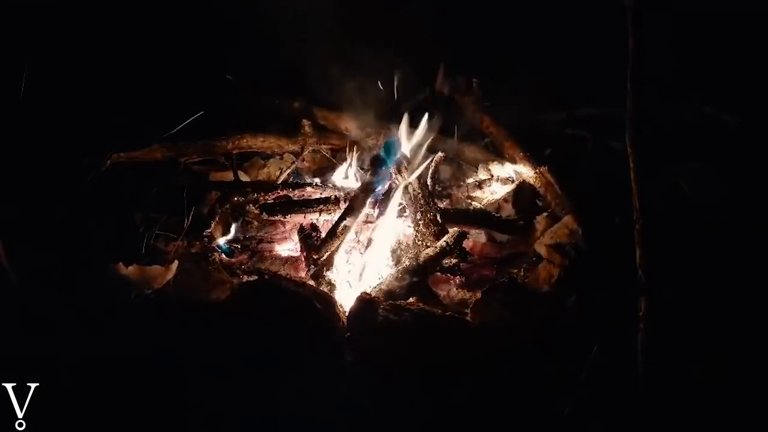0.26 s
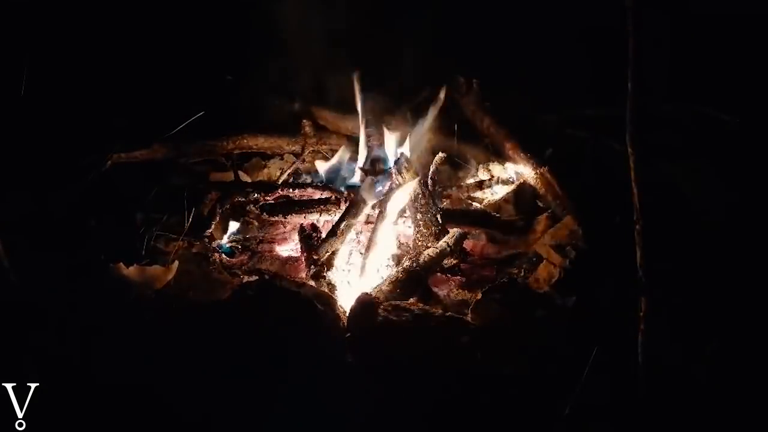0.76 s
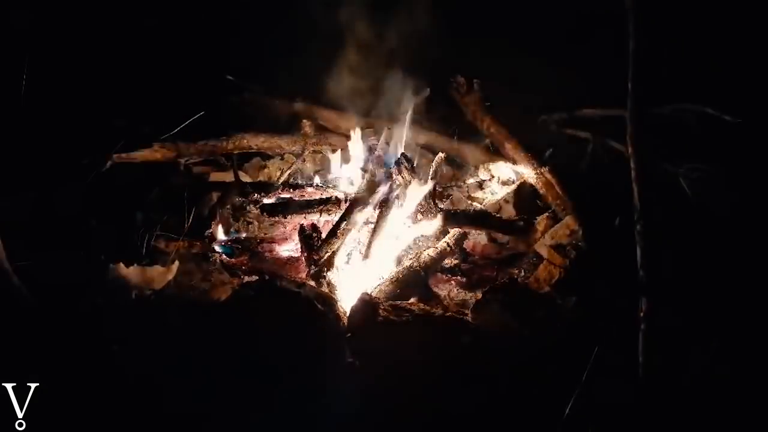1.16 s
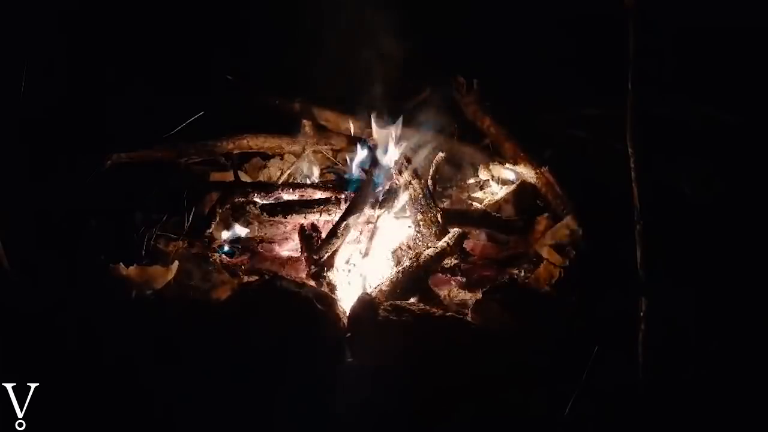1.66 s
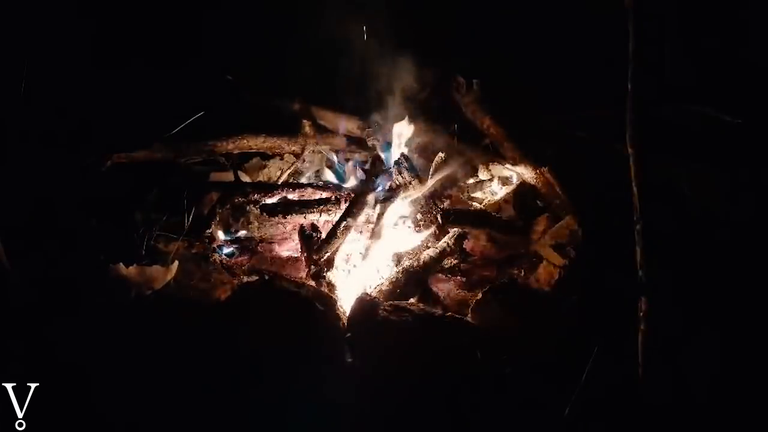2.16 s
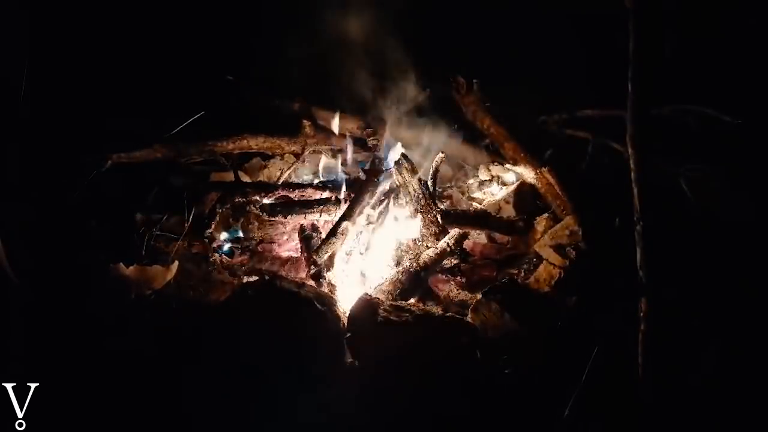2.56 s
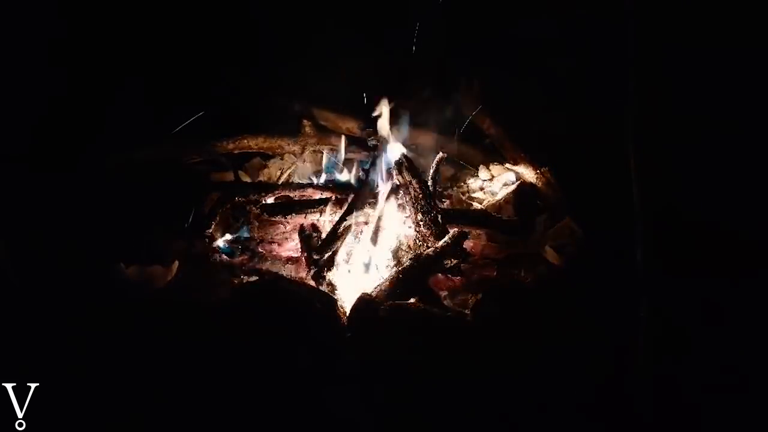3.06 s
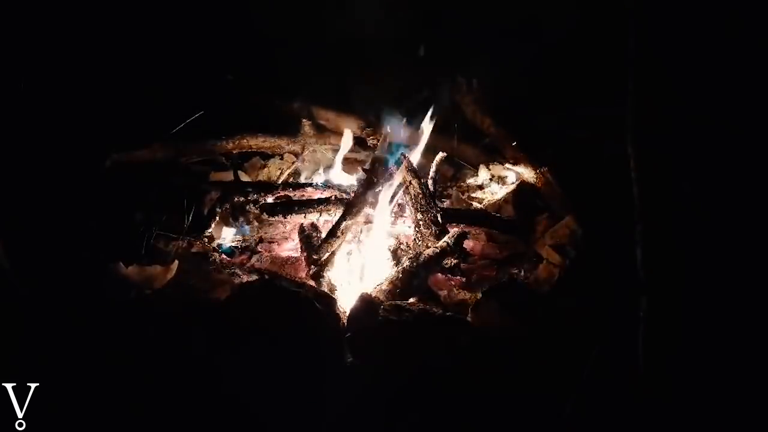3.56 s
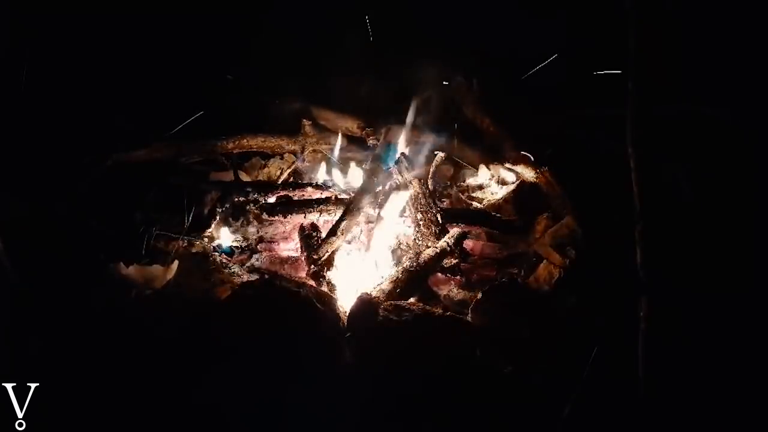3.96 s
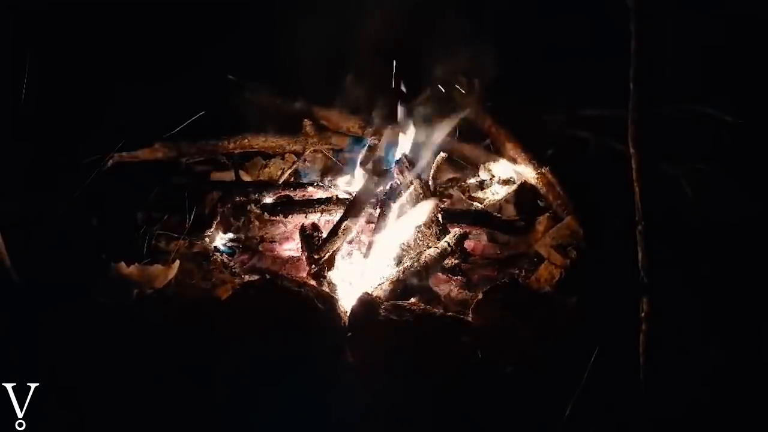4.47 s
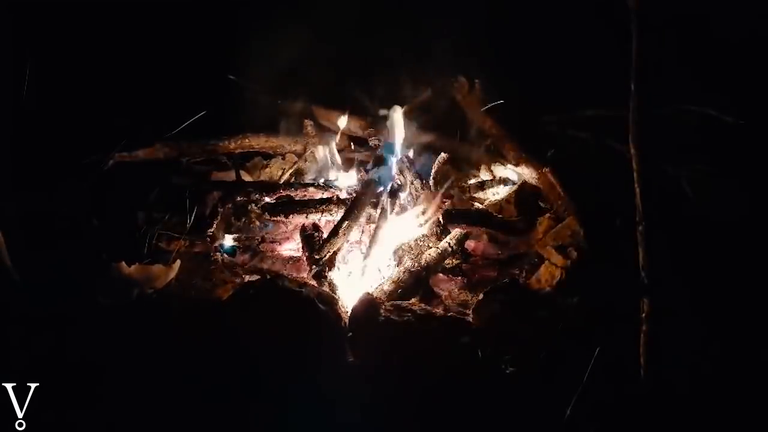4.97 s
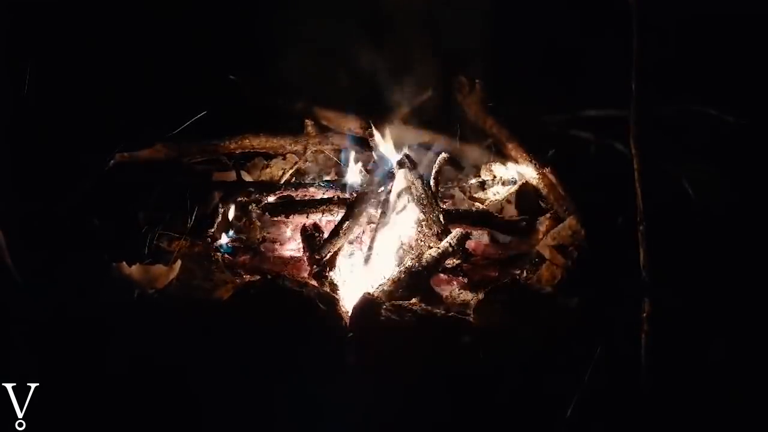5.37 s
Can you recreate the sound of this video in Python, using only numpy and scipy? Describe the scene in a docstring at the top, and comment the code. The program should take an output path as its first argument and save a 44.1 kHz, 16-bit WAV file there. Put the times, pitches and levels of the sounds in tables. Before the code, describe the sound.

A wood fire crackles outdoors at night, dry ticks and sharp loud pops over a low fluttering rumble and faint hiss.

```python
"""A campfire a little to the left of a stereo microphone.
Flames rumble and hiss throughout as shaped noise, and embers tick from the first moments as damped rings.
A log then bumps softly and others split with sharp pops: short shocks exciting resonances of the wood.
From about one second on, steam also spits from the bark in bright bursts.
Ground, woodpile and trees return the sound as a delayed copy, early reflections and a scattered tail."""
import sys
import numpy as np
from scipy import signal
from scipy.fft import rfft, irfft
from scipy.io import wavfile
from scipy.ndimage import uniform_filter1d

SR = 44100
rng = np.random.default_rng(int(sys.argv[2]) if len(sys.argv) > 2 else 0)


def int16_out(signal):
    """Quantize to a 16-bit WAV file."""
    q = np.round(np.clip(np.atleast_2d(signal).T, -1, 1) * 32767)
    wavfile.write(sys.argv[1], SR, q.astype(np.int16))


N = 247886

# the flames swell and sink: t/s, level/dB
FLAME_LEVEL = [(0.0, -42.5), (0.55, -37.5), (0.85, -40), (1.6, -36.5), (2.0, -37.5), (2.85, -34),
               (3.2, -36.5), (3.85, -36), (4.3, -39.5), (4.72, -36.5), (4.82, -40.5), (5.3, -43),
               (5.62, -40)]
FIRE_PAN_DB = 5  # left minus right
LOG_ECHO_DB = -7  # pops and bumps, sent to the trees
KNOCK_HZ, KNOCK_WIDTH_HZ = 810, 430  # body of the log
FIZZ_HZ, FIZZ_WIDTH_HZ = 9630, 2900  # escaping steam


def gain_of(db):
    """Logarithmic level: 20 dB is a factor of ten in amplitude."""
    return 10 ** (np.asarray(db) / 20)


def evened(x):
    """Normalization: scales to an rms of 1."""
    return x / np.sqrt(np.mean(x ** 2) + 1e-20)


def read(points, hz):
    """Interpolation along a logarithmic frequency axis."""
    f, value = np.transpose(points)
    return np.interp(np.log(hz + 1), np.log(f + 1), value)


def follow(curve):
    """Amplitude modulation: a level curve becomes a gain for every sample."""
    times, levels_db = np.transpose(curve)
    return gain_of(np.interp(np.arange(N) / SR, times, levels_db))


def add(mix, s, sound):
    """Superposition: adds a sound into the mix from time s on."""
    start = max(0, round(s * SR))
    part = mix[..., start:][..., :sound.shape[-1]]
    part += sound[..., :part.shape[-1]]


def panned(x, pan_db):
    """Level-difference stereo: left exceeds right by pan_db, with their mean kept."""
    ratio = gain_of(pan_db)
    return np.array([ratio * x, x]) * 2 / (1 + ratio)


def diffuse(magnitude, hz, pan_db):
    """Diffuse field: stereo noise shaped frame by frame, its channels less coherent in the treble."""
    # coherence of the two channels: f/Hz, likeness/1
    likeness = [(30, .93), (200, .86), (1000, .82), (4000, .68), (9000, .5), (14000, .1)]
    a, b, c, d = rng.standard_normal((4, *magnitude.shape))
    left = a + 1j * b
    independent = c + 1j * d
    same = np.clip(read(likeness, hz), -1, 1)
    right = same * left + np.sqrt(1 - same ** 2) * independent
    z = np.array([left * gain_of(pan_db), right])
    size = 2 * (len(hz) - 1)
    frames = (z * magnitude).swapaxes(1, 2)
    x = signal.istft(frames, nperseg=size, noverlap=size - size // 4)[1]
    return x / x.mean(0).std()


def turbulence(spectrum, flicker_db, patchy_db, size):
    """Turbulent flow: broadband noise with a flicker common to all bands and drifting spectral patches."""
    # stereo balance: f/Hz, left minus right/dB
    balance = [(60, 6), (300, 6.07), (2000, 3.9), (8000, 3.8), (13000, 4.1)]
    hz = np.fft.rfftfreq(size, 1 / SR)
    frames = N // (size // 4) + 5
    patches = uniform_filter1d(rng.standard_normal((frames, len(hz))), size=6, axis=0)
    patches = evened(uniform_filter1d(patches, size=14, axis=1))
    flicker = evened(uniform_filter1d(rng.standard_normal((frames, 1)), size=4, axis=0))
    field_db = read(spectrum, hz) + patchy_db * patches + flicker_db * flicker
    return diffuse(gain_of(field_db), hz, read(balance, hz))[:, :N]


def flames():
    """Combustion noise: the low roar of the flames and the hiss of gas leaving the wood."""
    # relative spectrum of the roar: f/Hz, density/dB per Hz
    roar_spectrum = [(12, 0.5), (27, 2.5), (38, -1), (49, -6), (64, 2), (81, -4.5), (97, 0), (122, -3.5),
                     (160, -12.5), (220, -19.5), (350, -26.5), (700, -30), (1500, -45), (4000, -78)]
    # relative spectrum of the hiss: f/Hz, density/dB per Hz
    hiss_spectrum = [(150, 8), (400, 7), (800, 1), (1400, 0.5), (3000, -1), (6000, -1.5), (8000, -3.5),
                     (10000, -0.5), (12500, -1.5), (14000, -6), (16000, -19)]
    # hiss of the burning wood: t/s, level/dB
    hiss_level = [(0.0, -54), (1.0, -51.5), (1.25, -49), (1.85, -51), (2.25, -48), (3.9, -49.5), (5.3, -53),
                  (5.62, -51.5)]
    roar = turbulence(roar_spectrum, flicker_db=-1.66, patchy_db=0.8, size=4096) * follow(FLAME_LEVEL)
    hiss = turbulence(hiss_spectrum, flicker_db=1.5, patchy_db=2.5, size=512) * follow(hiss_level)
    return roar + hiss


def ring(modes, size=2048):
    """Minimum-phase resonance: causal response of modes (Hz, half-power width Hz, energy level dB in 1 ms)."""
    hz = np.maximum(abs(np.fft.fftfreq(size, 1 / SR)), 1)
    power = 1e-12
    for centre, width, db in modes:
        detune = (hz ** 2 - centre ** 2) / (hz * width)
        peak = 1 / (1 + (detune / 1.55) ** 2) ** 2
        skirt = .0005 / (1 + (hz / centre / 2) ** 4)
        shape = peak + skirt
        power = power + shape / shape.mean() * gain_of(db) ** 2 * SR / 1000
    # the Hilbert transform of the log magnitude gives the phase
    log_response = np.conj(signal.hilbert(np.log(power) / 2))
    return np.fft.ifft(np.exp(log_response)).real[:size // 2]


def fracture(length, size=4096, count=2):
    """Impulsive excitation: fibres tear in a quick run of tiny shocks, of unit energy."""
    t = np.arange(size) / SR
    envelope = np.exp(-(t / max(length * 1.6, 3e-4)) ** 2)
    x = rng.standard_normal(size) * envelope
    # each pass flattens the spectrum, then fades the burst again
    for _ in range(count):
        z = rfft(x)
        x = irfft(z / (abs(z) + 1e-9)) * np.sqrt(envelope)
    return x / np.linalg.norm(x)


def tick(hz, db, length=0.0014, overtone_db=-6, lower_db=-9, after_db=-5):
    """Damped modes: a split ember rings at three uneven pitches, struck again by a weaker aftershock."""
    slowness, upper, lower, delay = rng.random(4)
    shocks = np.zeros(1024)
    add(shocks, 0, fracture(length * (.5 + slowness), size=512, count=1))
    aftershock = gain_of(after_db) * fracture(length, size=512, count=1)
    add(shocks, 0.001032 + .005 * delay, aftershock)
    overtone_hz = min(hz * (1.62 + 1.36 * upper), 14000)
    lower_hz = hz * (.5 + 0.047 * lower)
    partials = [(hz, 0), (overtone_hz, overtone_db), (lower_hz, lower_db)]
    modes = [(f, .38 * f, db + rel_db) for f, rel_db in partials]
    return signal.fftconvolve(shocks, ring(modes))


def embers(faint_db=-50, spread_db=2.0, middle_db=-41, range_db=4, lowest_hz=1000, span=7,
           scatter_db=2, count=160):
    """Random point process: clear ticks, softer ones that grow with the flames, and a faint patter."""
    # the clearest ticks: t/s, main ring f/Hz, level of the main ring/dB
    clear_ticks = [(0.1291, 1110, -42), (0.2939, 1660, -36.5), (0.368, 10400, -39.5), (0.764, 1170, -37.5),
                   (0.796, 6000, -35.5), (0.8599, 830, -40), (0.876, 1920, -39), (0.9627, 1470, -38),
                   (1.069, 2450, -39), (1.2188, 4430, -34), (1.689, 8700, -38), (1.964, 3140, -35),
                   (2.12, 9040, -37), (2.183, 714, -38), (2.3488, 4900, -37.5), (2.794, 1470, -32.5),
                   (3.014, 1780, -39), (3.199, 3280, -38), (3.324, 870, -35.5), (3.4755, 1510, -34),
                   (3.5194, 1040, -37.5), (3.5914, 1270, -37.5), (3.7797, 2600, -35), (3.8149, 2020, -33),
                   (3.9325, 617, -39), (3.969, 790, -37.5), (4.0364, 2130, -36.5), (4.4485, 12100, -36),
                   (5.464, 2480, -40.5)]
    out = np.zeros((2, N))
    for s, hz, db in clear_ticks:
        pan_db = FIRE_PAN_DB + scatter_db * rng.standard_normal()
        add(out, s, panned(tick(hz, db), pan_db))

    heat = np.sqrt(evened(follow(FLAME_LEVEL)))
    for when, pitch, strength in rng.random(size=(16, 3)):
        soft = heat[int(when * N)] * tick(lowest_hz * span ** pitch, middle_db - range_db * strength)
        add(out, when * N / SR, panned(soft, FIRE_PAN_DB))

    for when, pitch, strength, side in rng.random((count, 4)):
        db = faint_db - spread_db * np.log(max(strength, .04))
        pan_db = FIRE_PAN_DB + 2 * scatter_db * (2 * side - 1)
        add(out, when * N / SR, panned(tick(500 * 22 ** pitch, db), pan_db))
    return out


def burst(s, length, wood, others, echo_db, pan_db, spread_share=0.95, apart=0.11):
    """Source and resonator: a fracture rings the modes; gives its time and rows left, right, to the trees."""
    direct = panned(signal.fftconvolve(fracture(length), ring(wood + others)), pan_db)
    # short waves reach the two capsules differently: this part has opposite signs
    splash = apart * signal.fftconvolve(fracture(length), ring(wood[-1:] + others[:1]))
    # the trees hear all sides of the log at once, which evens out its resonances
    all_round = [(hz, max(width, spread_share * hz), db) for hz, width, db in wood]
    far = gain_of(echo_db) * signal.fftconvolve(fracture(length), ring(all_round + others[:1]))
    return s, np.array([direct[0] + splash, direct[1] - splash, far])


def bump(s, length, db):
    """Impact excitation: a log shifts, and a soft shock rings three broad modes."""
    # modes of the bump: f/Hz, width/Hz, relative level/dB
    bump_modes = [(261, 130, -3.5), (1600, 1400, -4.5), (3250, 2300, -4.5)]
    modes = [(hz, width, db + rel_db) for hz, width, rel_db in bump_modes]
    return burst(s, length, modes, [], LOG_ECHO_DB, FIRE_PAN_DB)


def pop(s, length, knock_db, crack_hz, crack_db, snap_hz, snap_width, snap_db, fizz_db):
    """Sudden release: a split knocks the log, rings the crack and snaps fibres; steam escapes, the log recoils."""
    wood = [(KNOCK_HZ, KNOCK_WIDTH_HZ, knock_db),
            (crack_hz, 0.3 * crack_hz, crack_db),
            (snap_hz, snap_width, snap_db)]
    fizz = (FIZZ_HZ, FIZZ_WIDTH_HZ, fizz_db)
    recoil = (295, 270, knock_db - 9.5)
    # a narrow part of the crack rings on
    ring_on = (crack_hz, 0.074 * crack_hz, crack_db - 17.5)
    return burst(s, length, wood, [fizz, recoil, ring_on], LOG_ECHO_DB, FIRE_PAN_DB)


def spit(s, length, db, jet_hz, wood_db, echo_db):
    """Jet noise: a bright burst of steam on the left that hardly moves the log."""
    modes = [(KNOCK_HZ, KNOCK_WIDTH_HZ, db + wood_db - 15.5),
             (4260, 6100, db + wood_db),  # wood
             (jet_hz, 3700, db)]
    fizz = (FIZZ_HZ, FIZZ_WIDTH_HZ, db - 10.5)
    return burst(s, length, modes, [fizz], echo_db, pan_db=13.5, apart=0.83)


def logs():
    """Superposition of all bumps, pops and spits: the direct sound and what reaches the trees."""
    # a log shifts: t/s, fracture length/s, level/dB
    bump_rows = [(0.403, 0.017, -38), (0.534, 0.0031, -29)]
    # a log splits: t/s, fracture length/s, knock level/dB, crack f/Hz, crack level/dB,
    # snap f/Hz, snap width/Hz, snap level/dB, steam fizz level/dB
    pop_rows = [ (0.4188, 0.0015, -36.5, 1210, -27.5, 3140, 3400, -30.5, -56),
                (0.516, 0.0026, -53, 1970, -32, 6000, 4000, -33.5, -39),
                (1.2086, 0.00096, -25, 2170, -19.5, 4250, 2940, -17.5, -24),
                (1.2895, 0.0023, -18, 2850, -15.5, 1420, 420, -17.5, -27.5),
                (1.956, 0.0016, -47, 3120, -34.5, 6200, 2500, -32, -26),
                (2.0237, 0.00137, -21.5, 2980, -11.5, 5400, 1700, -13, -17),
                (2.3437, 0.00039, -32.5, 2170, -31, 5400, 1700, -32, -57),
                (2.711, 0.0025, -40, 3200, -36.5, 4350, 800, -28, -37),
                (4.0745, 0.00073, -39, 2570, -23, 9000, 750, -16.5, -22.5),
                (4.18, 0.00071, -22, 2620, -22, 3950, 655, -15.5, -31),
                (4.2072, 0.0011, -38, 3140, -30, 5700, 1200, -40, -31.5),
                (4.4786, 0.00053, -40, 2100, -29.5, 6000, 4000, -39, -46),
                (4.7315, 0.00059, -34, 2300, -18, 6170, 2200, -27, -22),
                (4.921, 0.0022, -32.5, 2540, -28.5, 4760, 2000, -42, -47),
                (5.126, 0.0013, -41, 2710, -20.5, 8950, 750, -15, -21),
                (5.1988, 0.0011, -28.5, 2940, -33, 5000, 2500, -44, -55),
                (5.232, 0.00079, -20, 2750, -21, 3950, 640, -14.5, -29.5)]
    # steam spits from the bark: t/s, burst length/s, jet level/dB, jet f/Hz,
    # wood level relative to the jet/dB, gain towards the trees/dB
    spit_rows = [(1.017, 0.0042, -15, 11700, -13.5, -2.5), (1.3984, 0.0023, -19.5, 12900, -10, -2.5),
                 (1.4116, 0.017, -23, 12500, -0.5, -3), (3.0136, 0.0023, -35, 12800, 2, -11),
                 (4.8376, 0.00046, -24, 14200, -5.5, -9.5)]
    out = np.zeros((3, N))
    for source, rows in (bump, bump_rows), (pop, pop_rows), (spit, spit_rows):
        for row in rows:
            add(out, *source(*row))
    return out[:2], out[2]


def ground(x, delay=0.00038, bounce_db=-6, dull_hz=2200, size=256):
    """Interference: soft ground returns a dull copy just after the direct sound, hollowing out the middle."""
    hz = np.fft.rfftfreq(size, 1 / SR)
    delayed = np.exp(-2j * np.pi * hz * delay)
    bounce = gain_of(bounce_db) * delayed / (1 + (hz / dull_hz) ** 4)
    return x + signal.lfilter(irfft(bounce)[:size // 4], 1, x)


def woodpile(x, level_db=-11, decay=0.0042, size=1200):
    """Early reflections: quick returns between logs and ground, partly shared by both channels."""
    t = np.arange(size) / SR
    taps = rng.standard_normal((2, size)) * np.exp(-t / decay) * (t > .0012)
    taps = taps + taps.mean(0)
    taps = taps / np.linalg.norm(taps[0])
    return x + gain_of(level_db) * signal.oaconvolve(x, taps, axes=1)[:, :N]


def trees(x, pan_db=3, build=0.00077, patchy_db=1.5, size=256, count=420):
    """Multiple scattering: trunks and leaves return a grainy tail that builds up and dies away."""
    # colour of the echo: f/Hz, relative gain/dB
    echo_colour = [(300, -21), (800, -2), (2800, 0), (5000, 4), (10000, 6), (16000, 0)]
    # decay by 60 dB: f/Hz, t60/s
    echo_decay = [(300, 0.32), (3000, 0.41), (8000, 0.24), (15000, 0.39)]
    hz = np.fft.rfftfreq(size, 1 / SR)
    t = np.arange(count)[:, None] * (size // 4) / SR
    grain_db = patchy_db * rng.standard_normal((count, 1))
    field_db = read(echo_colour, hz) - 60 * t / read(echo_decay, hz) + grain_db
    tail = diffuse(gain_of(field_db) * (1 - np.exp(-t / build)), hz, pan_db)
    tail = tail / np.linalg.norm(tail.mean(0))
    return signal.oaconvolve(x[None], tail, axes=1)[:, :N]


def scene():
    """Superposition of the flames, the ticks and logs, and their reflections."""
    fire = flames()
    ticks = embers()
    near, far = logs()
    close = woodpile(ground(near) + ticks)
    echoes = trees(far + gain_of(-10.5) * ticks.mean(0))
    return close + echoes + fire


def record(dry):
    """Saturation and band limiting: the recorder rounds off the tallest peaks and cuts the top treble."""
    lowpass = signal.firwin(255, 16300, window=("kaiser", 9), fs=SR)  # edge in Hz
    return signal.oaconvolve(np.tanh(dry), lowpass[None], "same")


dry = scene()
out = record(dry)
int16_out(out)
```